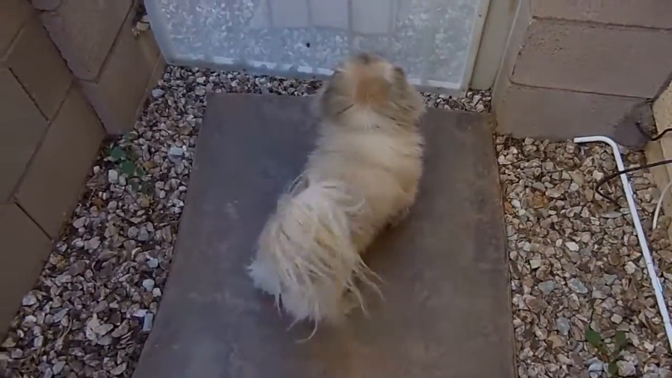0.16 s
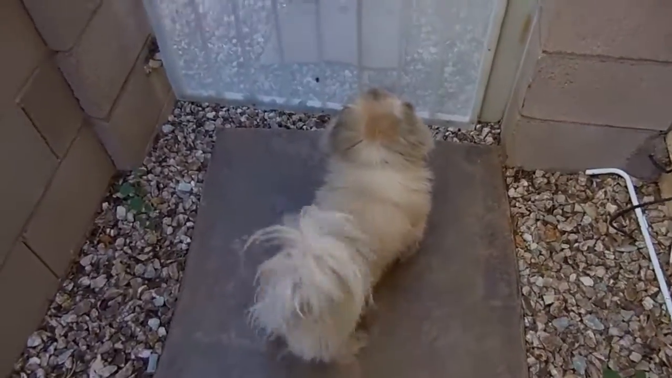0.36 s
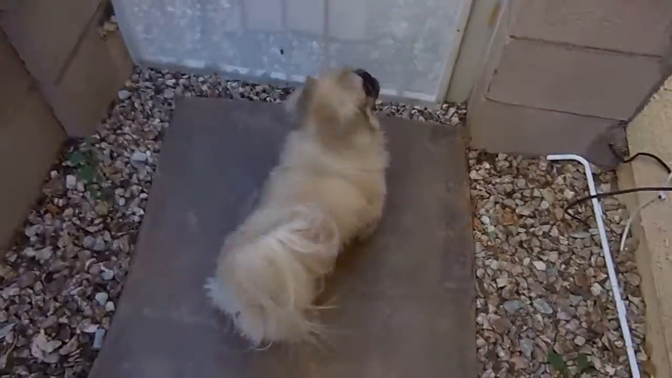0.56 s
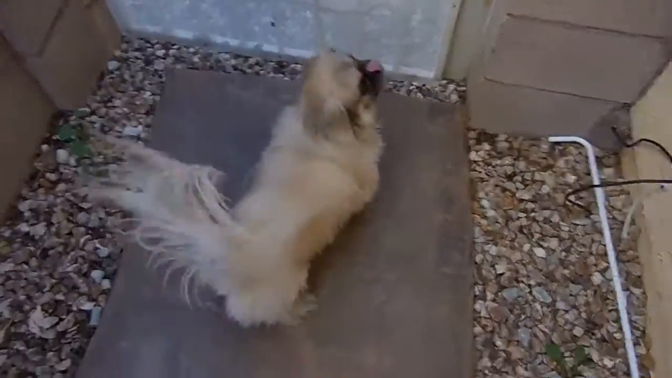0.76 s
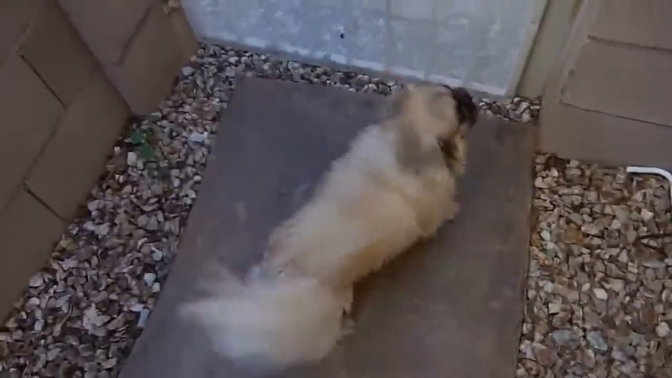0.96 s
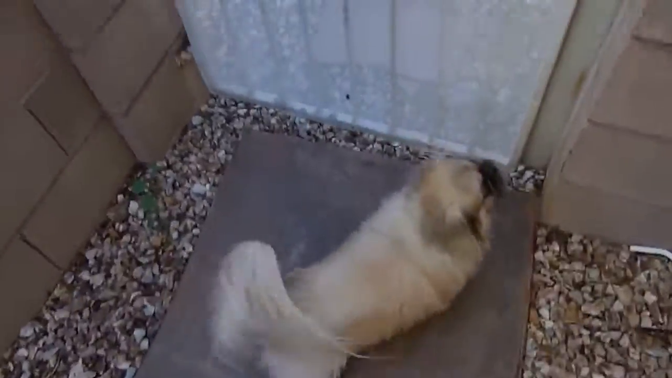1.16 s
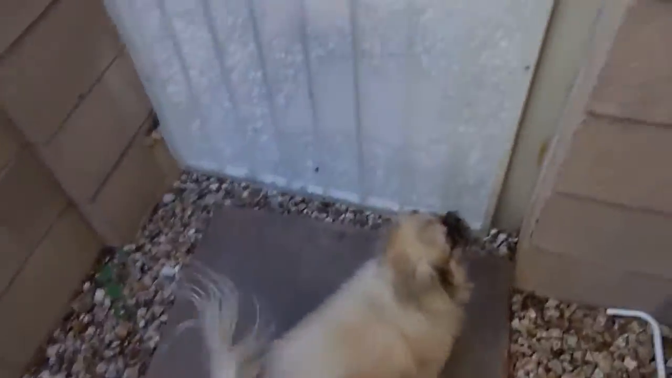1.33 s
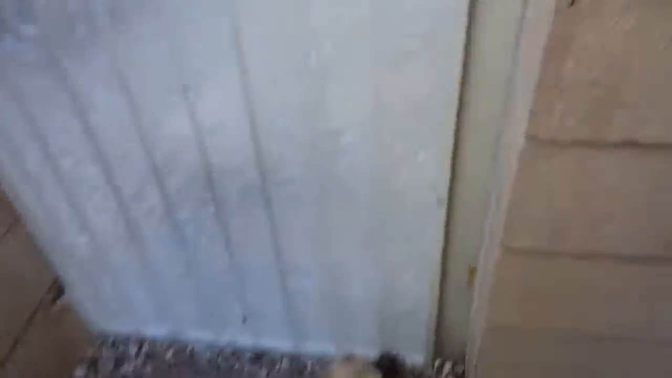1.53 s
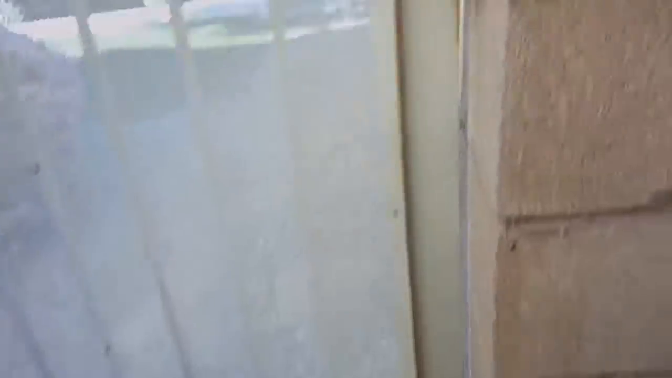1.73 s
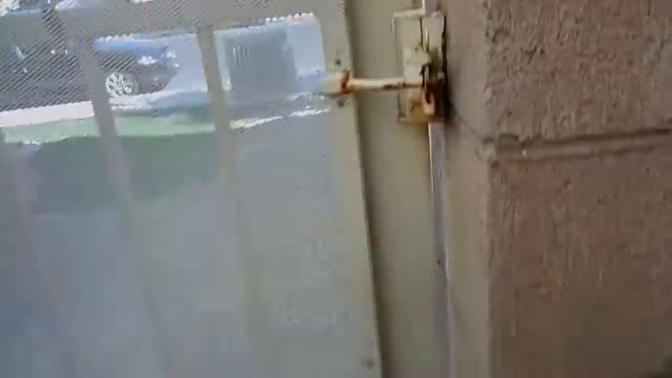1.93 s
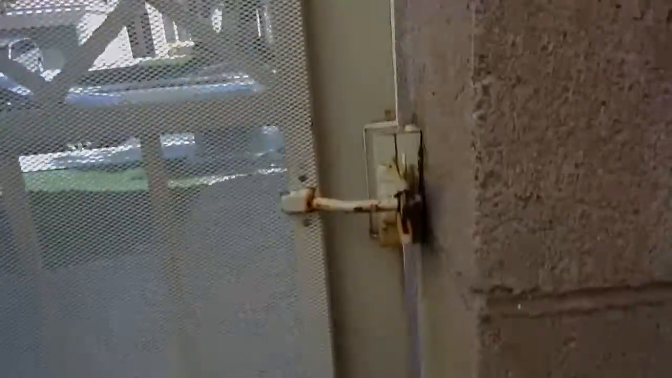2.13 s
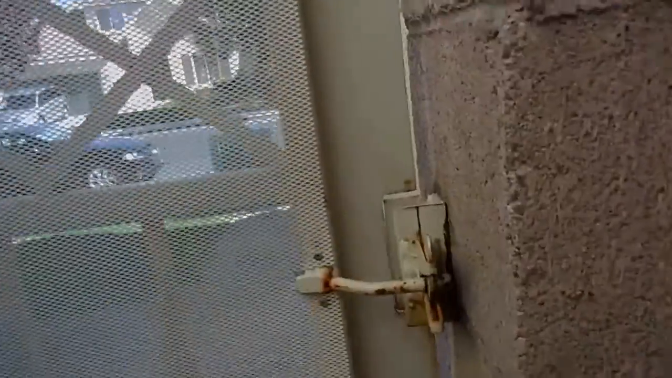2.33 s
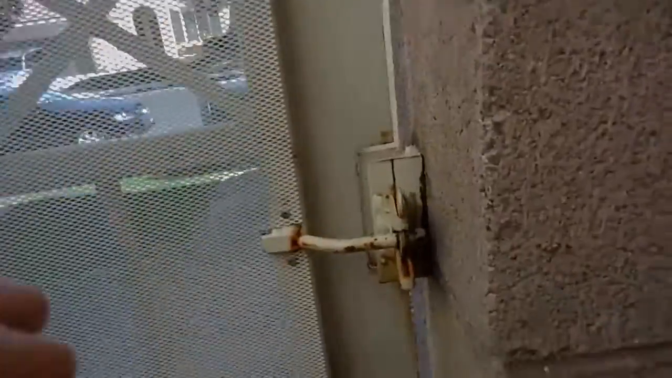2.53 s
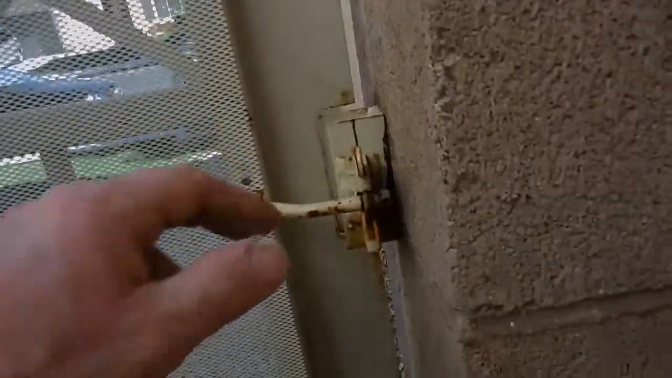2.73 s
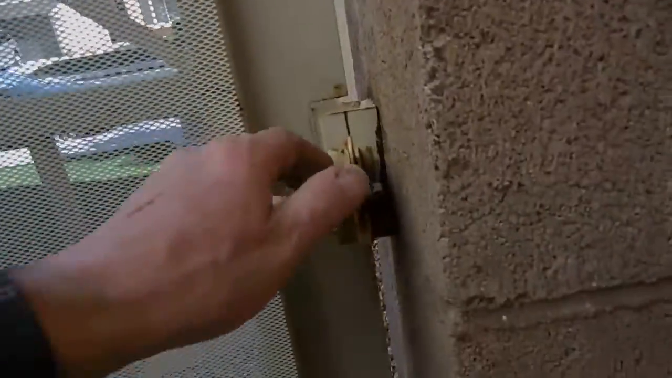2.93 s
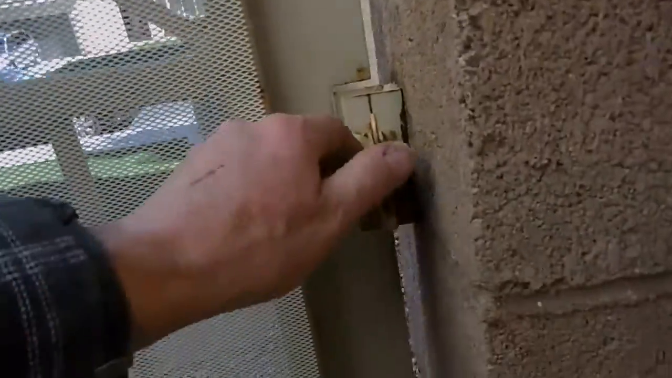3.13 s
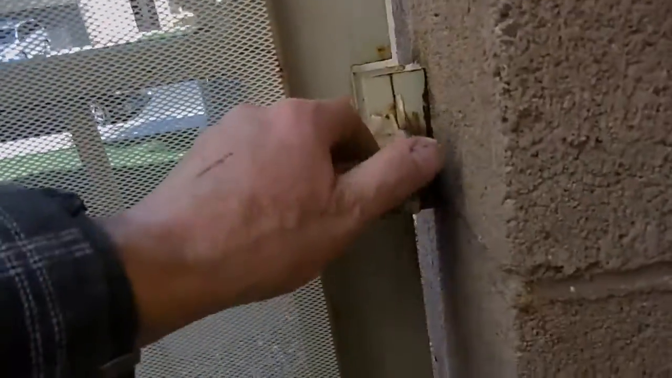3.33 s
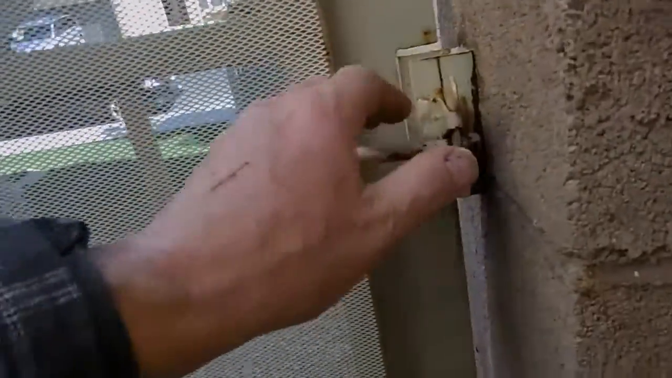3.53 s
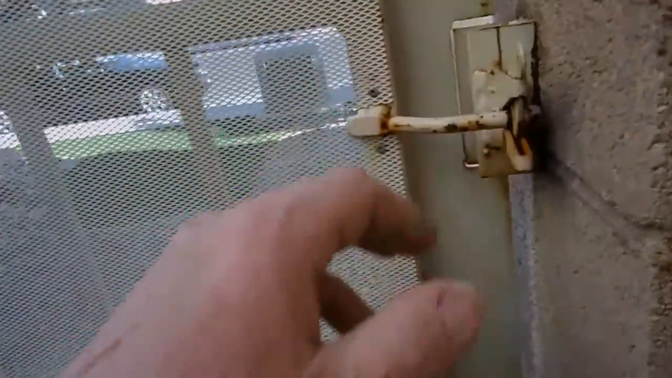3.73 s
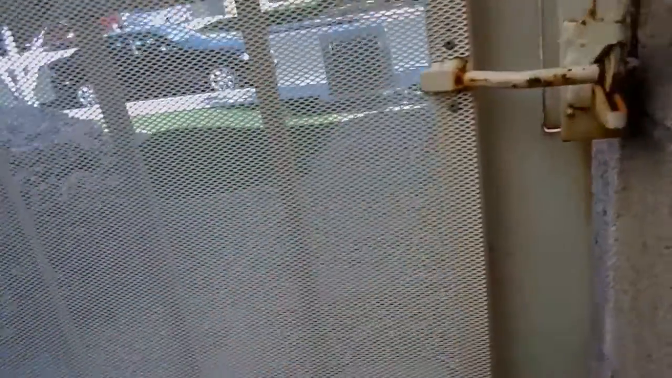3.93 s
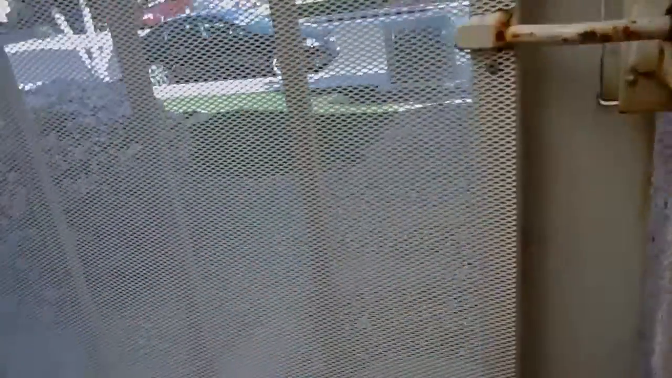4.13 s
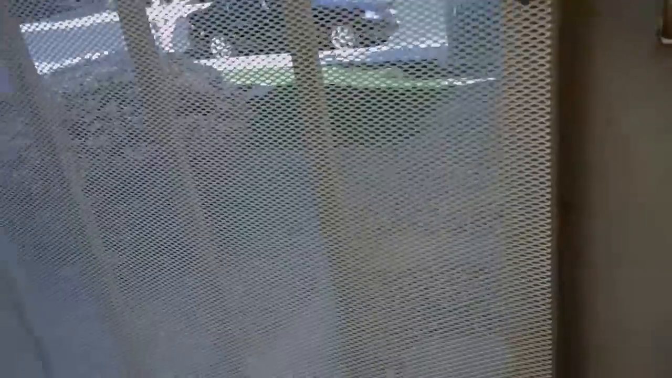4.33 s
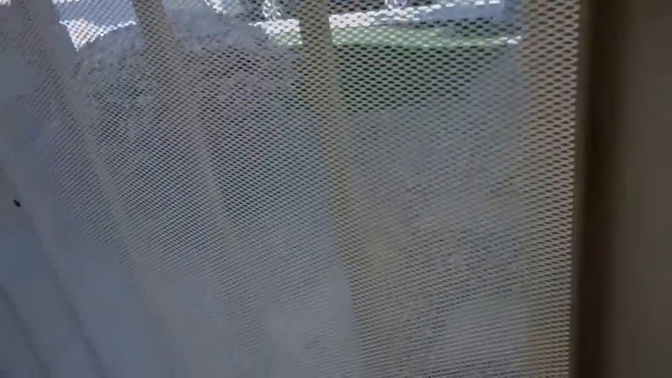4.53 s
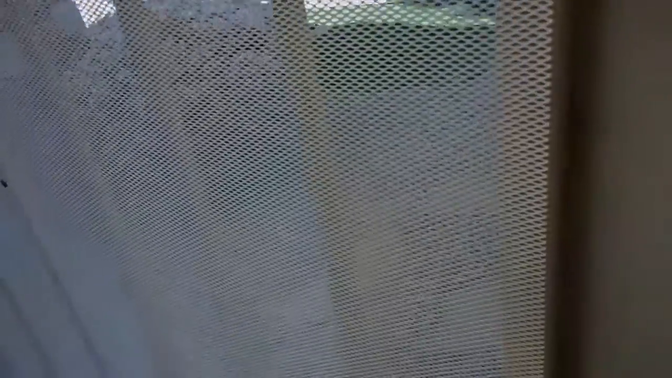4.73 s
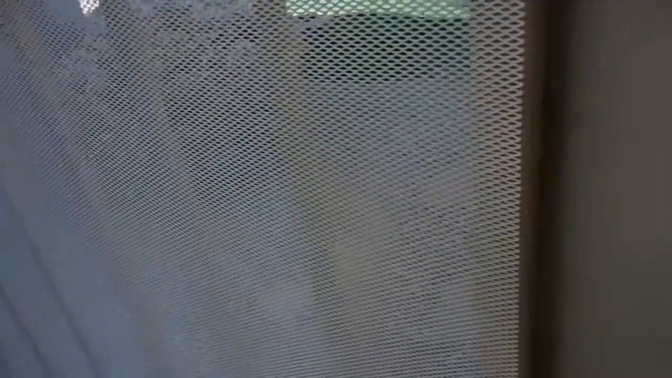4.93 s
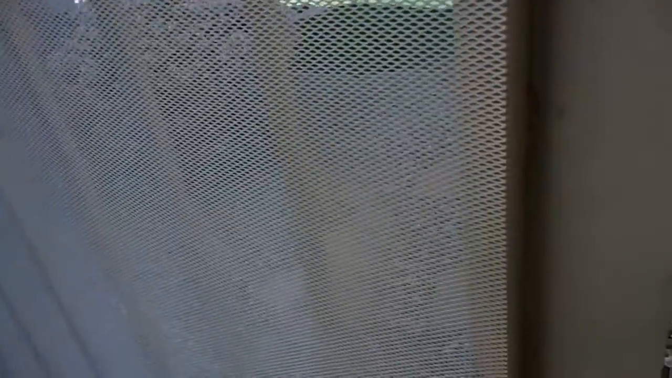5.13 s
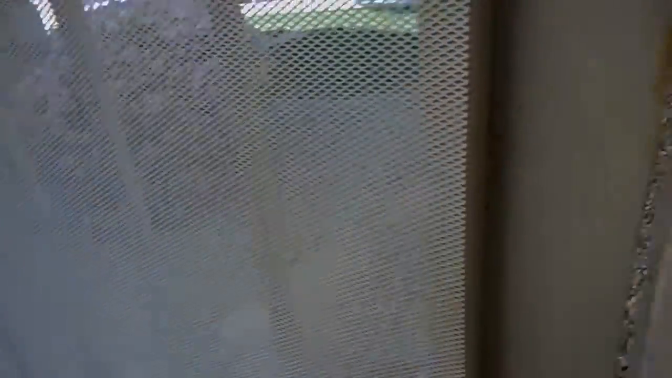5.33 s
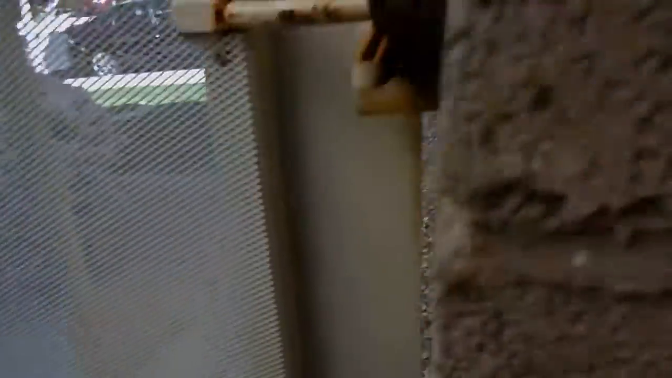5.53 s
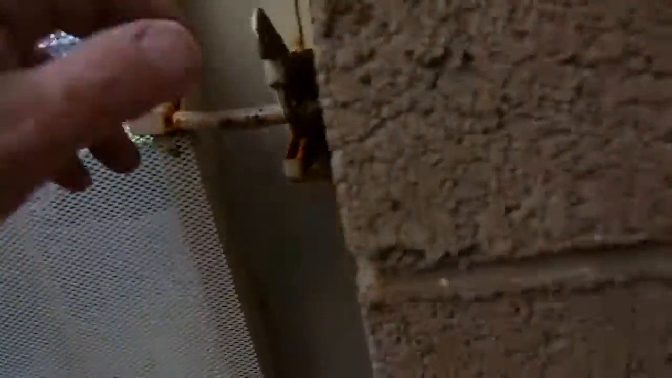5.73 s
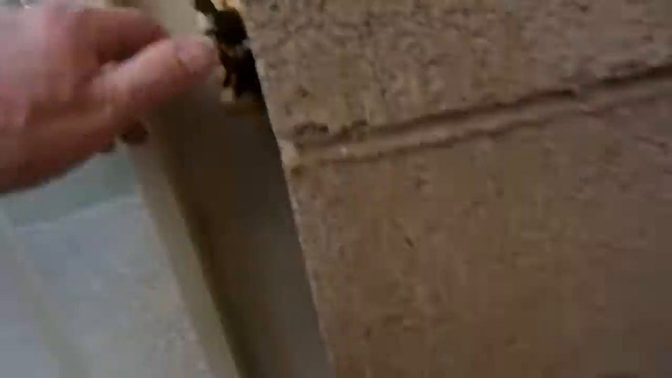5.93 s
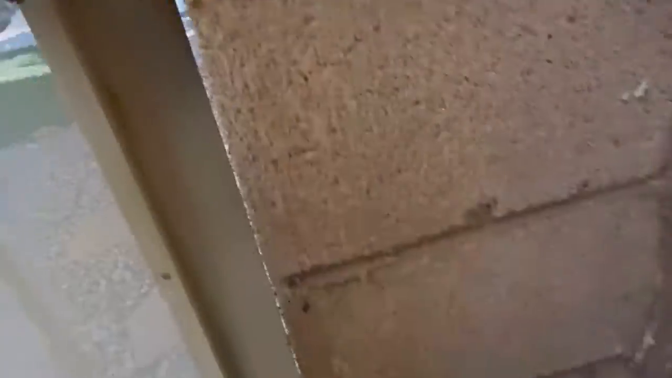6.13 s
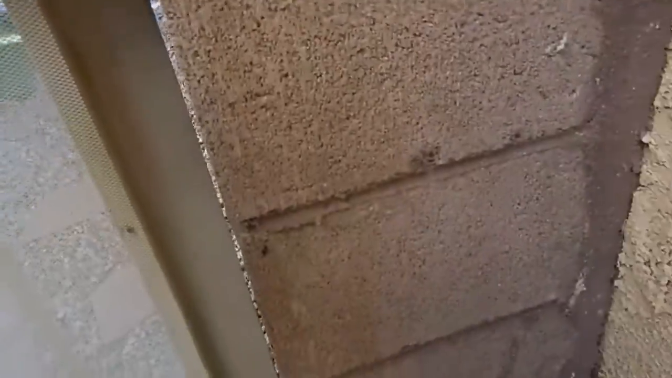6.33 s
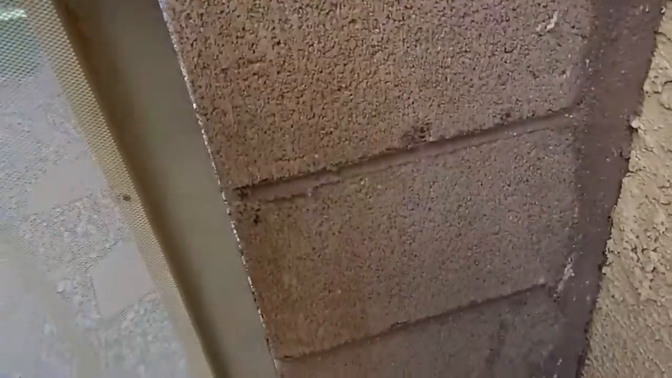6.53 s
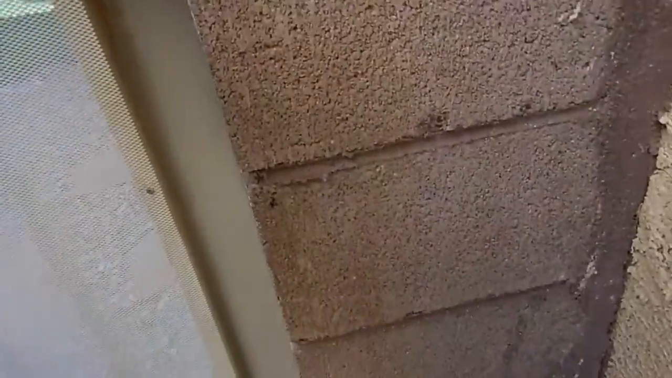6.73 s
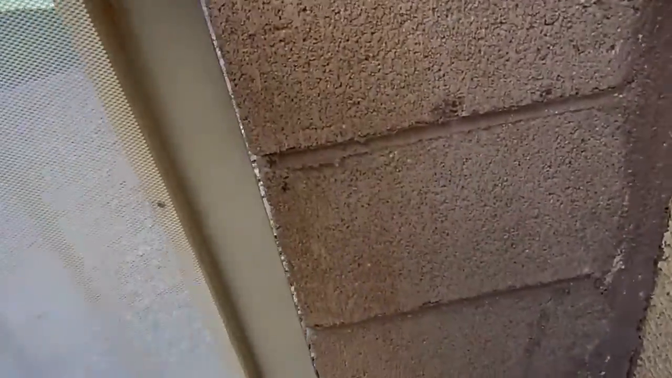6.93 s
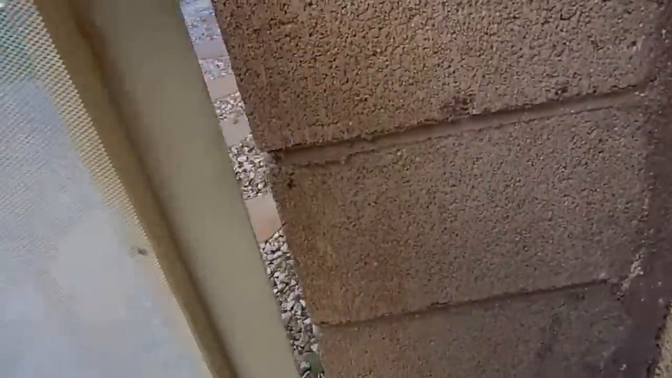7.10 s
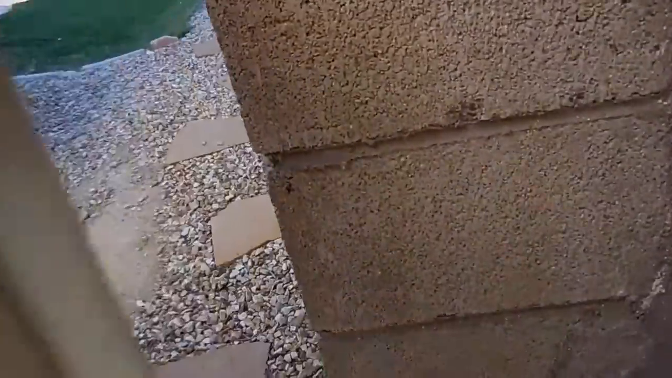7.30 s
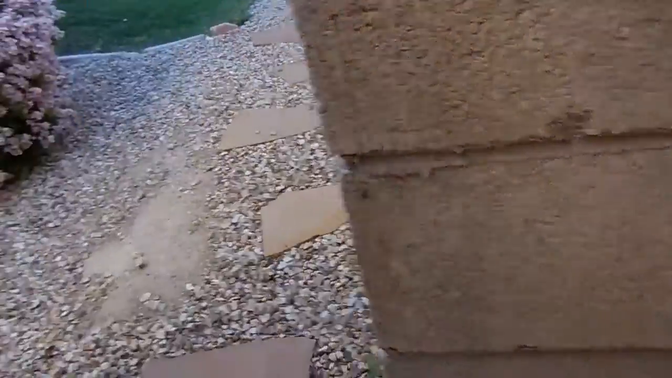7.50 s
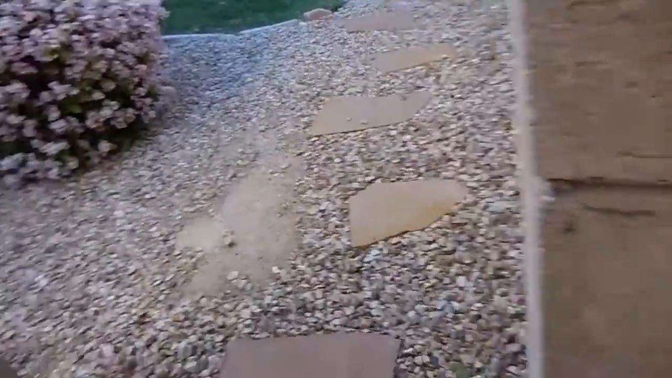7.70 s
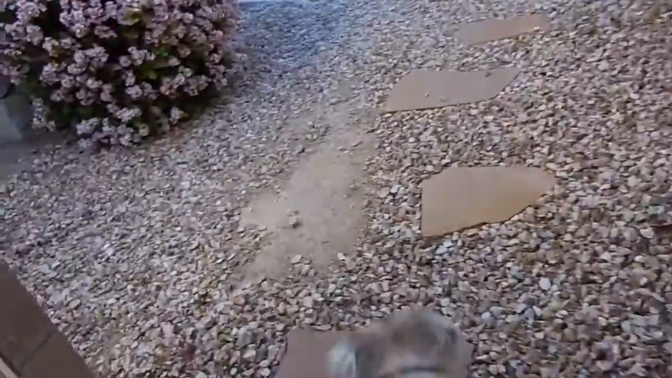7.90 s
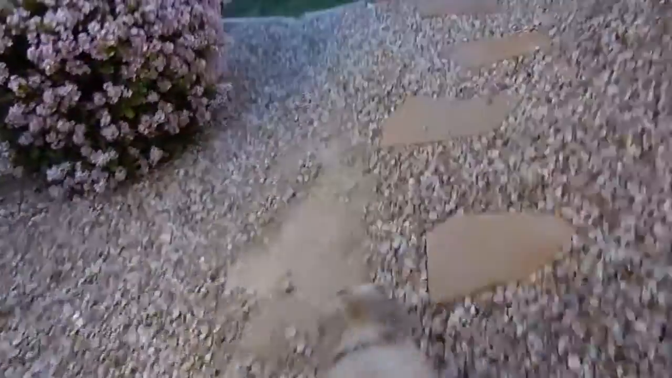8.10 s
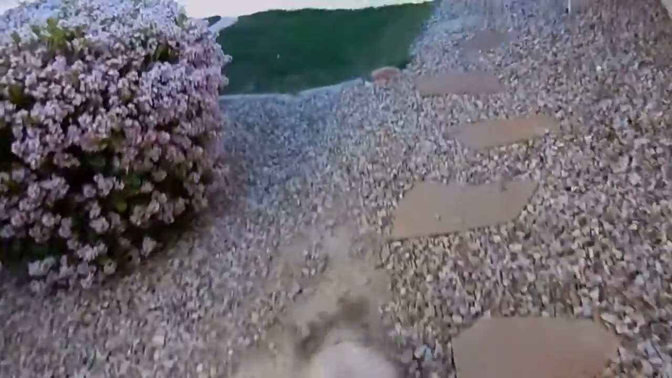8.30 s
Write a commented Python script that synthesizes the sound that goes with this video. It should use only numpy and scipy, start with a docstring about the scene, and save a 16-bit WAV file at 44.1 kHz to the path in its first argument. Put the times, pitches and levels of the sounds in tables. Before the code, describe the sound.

Close outdoors in a narrow block-walled passage, soles and sleeves scuff grittily with a few dry ticks and dull knocks. A small latch clink follows, then quiet mesh ticks. Bright metallic rasps and a brief hinge squeak lead into hard, clattering latch blows that ring on. The gate drags open and pebbles click and crunch, with a final bright jingling rasp over faint hum.

```python
"""Working the latch of a steel mesh gate

Someone scuffs up to a gate in a narrow block-walled passage and works its latch, heard close by.
Blows ring the latch parts as decaying sine waves; mesh ticks and rasps are shaped bursts of noise.
A hinge squeaks with a wavering tone, and the catch snaps free and rings.
The gate swings open and pebbles crunch as many tiny clicks, over a faint outdoor hum of coloured noise."""
import sys
import numpy as np
from scipy import signal
from scipy.fft import rfft, irfft, next_fast_len
from scipy.io import wavfile
from scipy.ndimage import uniform_filter1d, minimum_filter1d, map_coordinates

SR = 44100
rng = np.random.default_rng(int(sys.argv[2]) if len(sys.argv) > 2 else 0)


def inscribe(sig):
    """Save sig as 16-bit PCM at rate SR to the path in sys.argv[1].

    A 1-D sig is mono; a 2-D sig holds one channel per row.
    Samples are clipped to [-1, 1] before scaling.
    """
    pcm = np.round(np.clip(np.atleast_2d(sig).T, -1, 1) * 32767)
    wavfile.write(sys.argv[1], SR, pcm.astype(np.int16))


N = 373086  # length in samples
TOP_HZ = 16000  # nothing is kept from here up

# In all tables, t60 is the time a sound takes to fade by 60 dB.
# Colour of gritty hiss, for cloth, soles and sand: [f/Hz, relative level/dB per Hz]
HISS_COLOUR = [(1500, -10), (4300, -1.5), (6000, -1), (7700, 3.5), (10000, 2.5), (12500, -2), (15800, -4)]
# Notes at which the mesh panel can ring: [f/Hz]
MESH_MODES = [1000, 1240, 2158, 2681, 2837, 3127, 3774, 3821, 4247, 4576, 5170, 5686, 5830, 6650, 7210,
              8350, 10200, 11688, 14450, 14850, 15450]


def amp(db):
    """Turn decibels into a gain."""
    return 10 ** (np.asarray(db) / 20)


def unit(x):
    """Scale to rms 1."""
    return x / np.sqrt(np.mean(x ** 2) + 1e-20)


def along(points, hz):
    """Read a curve of (Hz, value) points on a logarithmic frequency axis."""
    f, v = np.transpose(points)
    return np.interp(np.log(hz + 1), np.log(f + 1), v)


def wobble(rate):
    """A smooth random curve through rate random points a second."""
    points = rng.standard_normal(int(N * rate / SR) + 4)
    return map_coordinates(points, [np.arange(N) * rate / SR])


def fade(t, t60):
    """Exponential decay that loses 60 dB in t60 seconds."""
    return np.exp(-np.log(1000) * t / max(t60, 1e-3))


def swell(s, rise, fall):
    """A stroke that peaks at time s: it grows 20 dB in rise seconds and loses 20 dB in fall seconds."""
    t = np.arange(N) / SR - s
    return amp(-20 * np.maximum(-t / max(rise, 1e-3), t / max(fall, 1e-3)))


def add(track, s, sound):
    """Mix a stereo sound in at time s."""
    i = max(round(s * SR), 0)
    track[:, i:i + sound.shape[1]] += sound[:, :max(N - i, 0)]


def pair(sources, spectrum, spread, lag):
    """Colour a direct and a scattered source for two ports; the left one lags by lag samples."""
    n = sources.shape[1]
    m = next_fast_len(n)
    hz = np.fft.rfftfreq(m, 1 / SR)
    direct, scattered = rfft(sources, m) * amp(along(spectrum, hz))
    turn = np.exp(-1j * np.pi * hz * lag / SR)  # half the lag for each port
    left = (direct + spread * scattered) * turn
    right = (direct - spread * scattered) / turn
    return unit(irfft([left, right], m)[:, :n])


def noise(n, spectrum, spread, lag):
    """Coloured stereo noise of rms 1."""
    return pair(rng.standard_normal((2, n)), spectrum, spread, lag)


def grains(spectrum, rate, spread, lag):
    """Tiny random contacts of very unequal size, rms 1."""
    sizes = rng.standard_normal((2, N)) * amp(1.3 * rng.standard_normal((2, N)))
    touching = rng.random((2, N)) < rate / SR
    return pair(touching * sizes, spectrum, spread, lag)


def patchy(x, depth_db):
    """The colour shifts from moment to moment as new spots touch; alike at both ports."""
    z = signal.stft(x, nperseg=256)[2]
    field = rng.standard_normal(z.shape[1:])
    field = uniform_filter1d(field, size=4, axis=0)  # smooth across frequency
    field = uniform_filter1d(field, size=9, axis=1)  # smooth across time
    gain = unit(amp(depth_db * unit(field)))
    return signal.istft(z * gain, nperseg=256)[1][:, :x.shape[1]]


def ring(modes, t, free, lead):
    """Decaying notes of a steel part, shorter when held; they reach the left port lead radians early."""
    ports = np.array([[lead], [-lead]]) / 2
    out = np.zeros((2, len(t)))
    for hz, db, t60 in modes:
        level = amp(db + rng.normal(0, 1))  # each note varies a little in strength
        out += level * fade(t, t60 * free) * np.sin(2 * np.pi * hz * t + ports)
    return out


def resonate(x, modes):
    """Sympathetic ringing of a set of modes driven by x."""
    response = ring(modes, np.arange(SR // 3) / SR, 0.79, lead=-1.37)
    return signal.fftconvolve(x, response / np.linalg.norm(response[0]), axes=1)[:, :N]


def outdoors():
    """Distant hum as low coloured noise, and one puff of air bumping the microphone."""
    # Colour of the outdoor hum: [f/Hz, relative level/dB per Hz]
    air = [(12, -33), (20, -1), (70, -2), (106, -7.5), (122, 4.5), (142, -5.5), (198, -2.5), (293, -11),
           (399, -9.5), (802, -11), (1220, -10), (1330, -14.5), (16000, -25.5)]
    puff = amp(-37.5) * swell(8.09, rise=0.31, fall=0.33)
    puff_colour = [(25, -0.5), (70, -9.5), (160, -26), (600, -41)]
    buffet = puff * noise(N, puff_colour, spread=0.48, lag=0)
    hum = amp(-52.0 + 0.49 * wobble(3.7)) * noise(N, air, spread=0.46, lag=0)
    return buffet + hum


def passage(x):
    """The block walls answer with a short diffuse tail: noise that fades at its own pace in each band."""
    # How long the passage echoes: [f/Hz, t60/s]
    echo_times = [(150, 0.11), (1200, 0.46), (3000, 0.38), (7000, 0.29), (15000, 0.27)]
    hz, t, z = signal.stft(rng.standard_normal((2, SR * 3 // 4)), SR, nperseg=256)
    decay = amp(-60 * t / along(echo_times, hz)[:, None])
    tail = signal.istft(z * decay, SR, nperseg=256)[1]
    late = np.pad(tail, ((0, 0), (200, 0)))  # starts 200 samples after the direct sound
    return signal.fftconvolve(x, late / np.linalg.norm(tail[0]), axes=1)[:, :N]


def walls(x):
    """Close walls return a few weak copies within milliseconds, different at each port."""
    out = x.copy()
    for port in np.eye(2):
        for delay in rng.uniform(.0008, .009, size=4):
            add(out, delay, amp(-16.0) * port[:, None] * x)
    return out


def swish():
    """Woven cloth slides over itself with a faint, narrow whistle that falls as it slows."""
    peak_s, peak_hz, fall_hz_per_s = 1.72, 8960, 780
    hz = peak_hz - fall_hz_per_s * (np.arange(N) / SR - peak_s)
    whistle = unit(wobble(700) * np.sin(2 * np.pi * np.cumsum(hz) / SR))
    return whistle * amp(-46) * swell(peak_s, rise=0.78, fall=0.14)


def scuffs():
    """Soles and sleeves brush along in strokes: a dull rub and a gritty hiss."""
    # Strokes, before mixing: [peak t/s, rub level/dB, hiss level/dB, rise/s, fall/s]
    strokes = [(0.184, -40.5, -55, 0.018, 0.021), (0.457, -42, -38, 0.13, 0.27),
               (0.63, -44, -52, 0.14, 0.087), (0.92, -46.5, -47, 0.37, 0.36),
               (1.215, -38, -38.5, 0.11, 0.22), (1.565, -43.5, -39, 0.25, 0.23),
               (1.881, -43, -45, 0.12, 0.047), (2.0, -48, -46, 0.081, 0.032), (2.22, -55, -61, 0.75, 0.92),
               (4.15, -51, -46, 0.16, 0.57), (4.62, -67, -45.5, 0.082, 0.06),
               (5.92, -50.5, -51.5, 0.097, 0.15)]
    # Colour of the dull rub: [f/Hz, relative level/dB per Hz]
    rub_colour = [(150, -37), (450, -10), (900, 2), (2300, 7.5), (4000, 3), (8000, 0)]
    rubbing, hissing = np.zeros((2, N))
    for s, rub_db, hiss_db, rise, fall in strokes:
        stroke = swell(s, rise, fall)
        rubbing = np.maximum(rubbing, amp(rub_db) * stroke)
        hissing = np.maximum(hissing, amp(hiss_db) * stroke)
    rub = amp(3.5) * noise(N, rub_colour, spread=1.0, lag=1.7)
    smooth = amp(3.0) * noise(N, HISS_COLOUR, spread=0.85, lag=4.5)
    grainy = amp(1.5) * grains(HISS_COLOUR, rate=560, spread=1.0, lag=3.4)
    brushing = rubbing * rub + hissing * (smooth + grainy)
    return brushing * amp(1.18 * wobble(60)) * amp([[-2.5], [1.2]])  # uneven, stronger on the right


def pebbles(rate, cycles, size_db):
    """Stones click together, each ringing for a few cycles at its own pitch; stereo, rms 1."""
    # Colour of the clicking stones: [f/Hz, relative level/dB per Hz]
    stone_colour = [(100, -1), (350, -1.5), (650, 4.5), (1300, 0), (2700, -5), (4500, -20), (9000, 13)]
    draws = rng.random((int(rate * N / SR), 3))  # time, pitch and size of each click
    hz = 350 * 20 ** draws[:, 1:2]
    k = np.arange(SR // 80)
    turns = hz * k / SR
    decay = np.exp(-np.log(1000) * turns / cycles)
    clicks = amp(size_db * draws[:, 2:] ** 2) * np.sin(2 * np.pi * turns) * decay * hz
    places = (draws[:, :1] * N).astype(int) + k
    track = np.bincount(places.ravel(), clicks.ravel())[:N]
    return pair(np.array([track, np.zeros(N)]), stone_colour, spread=0, lag=2.3)


def gravel():
    """The gate drags and pebbles shift underfoot, in clumps of small contacts."""
    # Pebbles shift, levels before clumping: [middle t/s, level/dB, half length/s, grit level over stones/dB]
    shifts = [(6.92, -41, 0.023, 4), (7.185, -49.5, 0.046, 12.5), (7.415, -40.5, 0.014, 6),
              (7.502, -43, 0.022, 4.5), (7.66, -56.5, 0.16, 10), (7.914, -39.5, 0.016, -14),
              (7.991, -52, 0.015, 12), (8.14, -37, 0.083, -9), (8.24, -42, 0.044, -12),
              (8.33, -37.5, 0.033, -3.5), (8.45, -46, 0.032, 0)]
    t = np.arange(N) / SR
    stirring = uniform_filter1d(1. * (t >= 6.36), size=400)  # stones keep stirring once the gate moves
    crunch, grit = amp(-54.5) * stirring, amp(-46) * stirring
    for s, db, half, grit_db in shifts:
        press = amp(db) * np.exp(-((t - s) / half) ** 2)
        crunch = crunch + press
        grit = grit + amp(grit_db) * press
    clumps = wobble(90)
    stones = crunch * amp(-2.5 + 2.4 * clumps) * pebbles(rate=1700, cycles=10, size_db=10.5)
    sand = grit * amp(3.0 + 1.6 * clumps) * grains(HISS_COLOUR, rate=3000, spread=0.66, lag=3.03)
    return stones + sand


def knocks():
    """Soft blows with one broad resonance, made of fading noise."""
    # Dull knocks of shoes, gate and larger stones: [t/s, level/dB, centre f/Hz, t60/s]
    thuds = [(0.181, -38, 1590, 0.055), (0.858, -39.5, 670, 0.081), (0.88, -38.5, 1100, 0.12),
             (1.642, -25.5, 950, 0.034), (1.643, -25.5, 1810, 0.032), (1.885, -28, 1490, 0.034),
             (4.121, -29.5, 416, 0.07), (6.758, -35, 1840, 0.044), (6.836, -22.5, 226, 0.068),
             (6.992, -25.5, 296, 0.11), (7.539, -34, 2740, 0.043), (7.745, -35, 2740, 0.052),
             (8.218, -36, 1260, 0.045), (8.315, -34.5, 2610, 0.088)]
    out, t = np.zeros((2, N)), np.arange(SR // 4) / SR
    for s, db, hz, t60 in thuds:
        body = [(hz / 8, -12), (hz / 1.26, -10), (hz, 0), (hz * 1.37, -12), (hz * 6, -35)]
        add(out, s, amp(db) * fade(t, t60) * noise(len(t), body, spread=0.087, lag=0.96))
    return out


def ticks():
    """Small dry contacts: short noise in three bands, each with its own brightness."""
    # Mesh, grit and pebble ticks: [t/s, mid level/dB, low level/dB, top level/dB, t60/s]
    contacts = [(0.1862, -22, -38, -20.5, 0.0038), (0.6138, -13.5, -37, -45, 0.01),
                (0.7656, -12, -31, -40, 0.0091), (1.3128, -36, -37, -29.5, 0.086),
                (3.564, -37, -38, -55, 0.026), (3.707, -29.5, -42, -31.5, 0.033),
                (3.7948, -27.5, -46, -26, 0.018), (3.915, -30, -40, -28.5, 0.031),
                (4.411, -32, -36.5, -31.5, 0.055), (4.5228, -40, -55, -28, 0.047),
                (4.556, -34, -42, -29.5, 0.063), (4.6997, -31, -39.5, -32, 0.024),
                (4.776, -32, -51, -32, 0.055), (5.2804, -38, -45, -34, 0.034),
                (5.699, -32, -30.5, -41, 0.056), (5.7294, -29, -27, -37.5, 0.027),
                (7.4822, -26.5, -23.5, -19.5, 0.039), (7.5037, -29, -29, -23, 0.06),
                (7.655, -40, -64, -20.5, 0.015), (7.7113, -27.5, -24.5, -27, 0.034),
                (7.851, -27.5, -44, -20, 0.042)]
    low_colour = [(200, 0.5), (1200, -8.5), (2800, 5.5), (5000, -4.0)]
    mid_colour = [(2000, -46), (4500, 3.0), (7500, 6.0), (9500, 6.5), (13000, -23)]
    top_colour = [(7000, -21.5), (11000, -3.5), (15500, -9.0), (17000, -21.0)]
    out, t = np.zeros((2, N)), np.arange(SR // 4) / SR
    for s, mid_db, low_db, top_db, t60 in contacts:
        low = amp(low_db) * noise(len(t), low_colour, spread=0.12, lag=2.4)
        mid = amp(mid_db) * noise(len(t), mid_colour, spread=1.0, lag=1.9)
        top = amp(top_db) * noise(len(t), top_colour, spread=0.96, lag=1.86)
        add(out, s, (low + mid + top) * fade(t, t60) * (1 - fade(t, t60 / 5)))
    return out


def pings():
    """Single brief notes of the thin frame as it is flexed, each a close, beating pair."""
    # Notes, before the onset is softened: [t/s, level/dB, f/Hz, t60/s]
    notes = [(4.792, -26.5, 9430, 0.15), (5.643, -31.5, 6700, 0.036), (5.701, -28.5, 5800, 0.032),
             (5.732, -27.5, 2790, 0.042), (6.213, -38.5, 1780, 0.12), (6.255, -26, 1370, 0.051),
             (6.255, -23, 3540, 0.034), (6.254, -23, 5800, 0.035), (6.33, -24, 7330, .05),
             (7.631, -35, 7600, 0.24), (8.1, -9, 13600, 0.083), (8.099, -14, 11700, 0.12),
             (8.101, -30, 7570, 0.27)]
    out, t = np.zeros((2, N)), np.arange(SR // 4) / SR
    for s, db, hz, t60 in notes:
        beating = ring([(hz, 0, t60), (hz + 70, -5, t60)], t, 1, lead=1.5)
        add(out, s, amp(db) * (1 - fade(t, 0.0032)) * beating)
    return out


def squeak():
    """Dry steel sticks and slips at an unsteady pitch; its overtone sounds only through the hinge's modes."""
    # Slips of the dry hinge: [peak t/s, level/dB, f at the peak before wavering/Hz]
    slips = [(6.408, -22.5, 2497), (6.425, -27, 2620), (6.46, -26, 2870)]
    # Notes of the hinge: [f/Hz, relative level/dB, t60 before damping/s]
    hinge = [(2413, -7.5, 0.48), (2880, -6, 0.56), (3170, -4, 0.25), (4860, 10, 0.064), (5654, -1, 0.16)]
    glide_hz_per_s = 1200  # each slip climbs in pitch
    t = np.arange(N) / SR
    tone, overtone = np.zeros((2, 1, N))
    for s, db, hz in slips:
        pitch = hz + glide_hz_per_s * (t - s)
        waver = 1 + .05 * wobble(700) + .008 * wobble(90)
        phase = 2 * np.pi * np.cumsum(pitch * waver) / SR
        effort = amp(db) * swell(s, rise=0.018, fall=0.032) * amp(3.5 * wobble(300))
        tone += effort * np.sin(phase)
        overtone += effort * np.sin(2 * phase)
    return tone + amp(-8) * resonate(tone + amp(-3) * overtone, hinge)


def rasps():
    """The mesh frame rubs and lets go: a swelling, very bright burst of noise."""
    # Rasps: [peak t/s, level/dB, rise/s, t60/s, body level before a 7 dB cut/dB]
    rubs = [(4.668, -28.5, 0.019, 0.1, -7), (4.795, -29.5, 0.0066, 0.071, -15),
            (5.42, -22.5, 0.0056, 0.059, -14.5), (6.218, -16, 0.0043, 0.15, -14),
            (6.257, -15.5, 0.0018, 0.041, 6), (6.266, -8.5, 0.0031, 0.055, -13),
            (6.301, -18.5, 0.019, 0.045, -13), (6.335, -12, 0.0072, 0.092, -15.5),
            (8.101, -14.5, 0.0082, 0.11, -11), (8.121, -20.5, 0.0037, 0.14, -16),
            (8.197, -21.5, 0.0075, 0.19, -16), (6.389, -26, 0.0093, 0.25, -9)]
    # Colour of the bright part: [f/Hz, relative level/dB per Hz]
    top_colour = [(3000, -38), (7000, -8), (9000, -8.5), (11000, 1.5), (12600, -8), (14300, 5), (15800, 7)]
    # Colour of the fuller body: [f/Hz, relative level/dB per Hz]
    body_colour = [(100, -5), (600, -8.5), (1100, 1), (2000, -4.5), (3500, 0), (7000, 1.5), (10000, -24),
                   (16000, -35)]
    lead = .1  # seconds of swelling before the peak
    out, t = np.zeros((2, N)), np.arange(SR // 2) / SR - lead
    for s, db, rise, t60, body_db in rubs:
        growth = np.exp(np.minimum(t, 0) / max(rise, 1e-3))
        decay = fade(np.maximum(t, 0), t60)
        bright = noise(len(t), top_colour + [(17000, -51)], spread=0.24, lag=-0.94)
        body = amp(body_db - 7.0) * noise(len(t), body_colour, spread=0.5, lag=-2.6)
        add(out, s - lead, amp(db) * growth * decay * (bright + body))
    return out


def mesh(x):
    """The mesh panel rings along; its higher modes die sooner."""
    return resonate(x, [(hz, 0, 0.2 * (hz / 1000) ** -.25) for hz in MESH_MODES])


def frame(x):
    """The bars of the gate ring on after a blow: close modes that beat into a rough, diffuse tail."""
    # Clusters of close modes in the barred frame: [centre f/Hz, relative level/dB, t60/s]
    clusters = [(1172, -1, 0.94), (2880, -1.5, 0.66), (4880, 5.5, 0.19)]
    t = np.arange(SR * 3 // 4) / SR
    response = np.zeros((2, len(t)))
    for centre_hz, db, t60 in clusters:
        for z in rng.standard_normal(size=14):
            hz = centre_hz * np.exp(.07 * z)
            turns = hz * t + rng.random((2, 1))  # a random starting phase at each port
            response += amp(db) * fade(t, t60) * np.sin(2 * np.pi * turns)
    return signal.fftconvolve(x, response / np.linalg.norm(response[0]), axes=1)[:, :N]


def clank(burst):
    """A burst of contacts excites the panel's modes, damped by the hand and the post."""
    t = np.arange(SR // 8) / SR
    modes = sum(rng.choice([-1, 1]) * np.sin(2 * np.pi * hz * t) for hz in MESH_MODES)
    modes = modes * fade(t, 0.028)
    rung = signal.fftconvolve(burst, modes[None] / np.linalg.norm(modes), axes=1)[:, :burst.shape[1]]
    return amp(0.5) * burst + amp(-9.5) * rung


def latch():
    """Each blow shakes the dense, short-lived modes of the gate and rings arm, bar, catch and pin."""
    # Latch blows, some with bounces, levels before mixing: [t/s, clatter level/dB, clatter t60/s,
    # clatter tilt above 900 Hz/dB per octave, arm level/dB, bar level/dB, catch level/dB,
    # pin level/dB, ring length (1 is free, less is held)]
    blows = [(3.192, -37.5, 0.061, -13.5, -30.5, -51, -78, -72, 0.2),
             (3.223, -24, 0.023, 4, -34, -37, -38, -55, 1), (3.267, -8, 0.045, 0, -45, -12, -35, -28, 0.49),
             (3.333, -40, 0.099, -4, -28, -62, -79, -45, 1),
             (6.549, -14, 0.093, -0.5, -27, -10.5, -14, -51, 0.14),
             (6.555, -12, 0.12, 4.5, -24, -14.5, -20.5, -29, 0.39),
             (6.681, -16, 0.05, -1.5, -17.5, -33, -15, -41, 0.59),
             (6.833, 3.5, 0.075, 1.5, -10, -25, -33, -11, 0.11),
             (6.987, -15.5, 0.12, -8, -46, -52, -3, -8.5, 0.64),
             (7.003, -8.5, 0.074, 4.5, -49, -35, -39, -41, 0.26),
             (7.015, -7.5, 0.075, 7.5, -54, -46, -5, -48, 0.15)]
    # Colour of the clatter before tilting: [f/Hz, relative level/dB per Hz]
    clatter = [(60, -27), (130, -14), (330, -20.5), (550, -13.5), (850, -7), (1300, -8.5), (2000, -0.5),
               (3000, 2), (5300, 1.5), (6300, -3), (8000, -3), (11000, -4), (15500, -16)]
    # Notes of the four latch parts when free: [f/Hz, relative level/dB, t60/s]
    arm_modes = [(1744, 0, 0.12), (1783, 3, 0.27)]
    bar_modes = [(990, 1, 0.048), (1736, 3, 0.12), (3965, 0.5, 0.12), (4690, -9, 0.2), (6940, 2.5, 0.049),
                 (7610, -6.5, 0.44), (13300, -1, 0.044)]
    catch_modes = [(3870, 1.5, 0.074), (4454, -20, 0.56), (4770, -25, 0.39), (4875, -3, 0.54),
                   (5210, -12, 0.15), (7446, -4, 0.2), (7800, -24, 0.61)]
    # The pin has a quick early decay, then a long thin tail; columns as above: [f/Hz, level/dB, t60/s]
    pin_modes = [(8985, -3, 1.02), (8985, -24, 4.2), (11470, -2.5, 0.079)]
    out, t = np.zeros((2, N)), np.arange(SR) / SR
    early = t[:SR // 4]
    for s, db, t60, tilt_db, arm_db, bar_db, catch_db, pin_db, free in blows:
        colour = [(hz, level + tilt_db * np.log2(max(hz, 900) / 900)) for hz, level in clatter]
        envelope = fade(early, t60) * (1 - fade(early, 0.011))
        burst = envelope * noise(len(early), colour, spread=0.54, lag=-1.88)
        add(out, s, amp(db) * clank(burst))
        arm = amp(arm_db) * ring(arm_modes, t, free, lead=-0.27)
        bar = amp(bar_db) * ring(bar_modes, t, free, lead=-0.079)
        catch = amp(catch_db) * ring(catch_modes, t, free, lead=0.92) * amp([[1.5], [-1]])
        pin = amp(pin_db) * ring(pin_modes, t, free, lead=0.95) * amp([[0], [2.5]])
        add(out, s, (arm + bar + catch + pin) * (1 - fade(t, 0.014)))
    return out


def scene():
    """Gate and footsteps in the passage, a little to the right."""
    blows = latch()
    rasp = patchy(rasps(), depth_db=4)
    gate = blows + amp(-0.5) * rasp + squeak() + pings()
    small = ticks() + knocks()
    steps = small + patchy(scuffs(), depth_db=2.5) + swish() + patchy(gravel(), depth_db=4.0)
    near = gate * amp([[-.6], [.6]]) + walls(steps) * amp([[-1.5], [.7]])
    shaken = amp(-20) * mesh(blows) + amp(-13.5) * mesh(rasp) + amp(-21) * frame(blows)
    echoes = amp(-15.0) * passage(gate) + amp(-10.5) * passage(small)
    return near + shaken + echoes + outdoors()


def record(dry):
    """A limiter holds down the hardest blows; nothing is kept above the band limit."""
    needed = np.minimum(1, amp(-.3) / (np.abs(dry).max(axis=0) + 1e-9))
    gain = uniform_filter1d(minimum_filter1d(needed, size=90), size=70)
    m = next_fast_len(N + SR // 4)
    kept = np.fft.rfftfreq(m, 1 / SR) < TOP_HZ
    return irfft(rfft(dry * gain, m) * kept, m)[:, :N]


dry = scene()
out = record(dry)
inscribe(out)
```